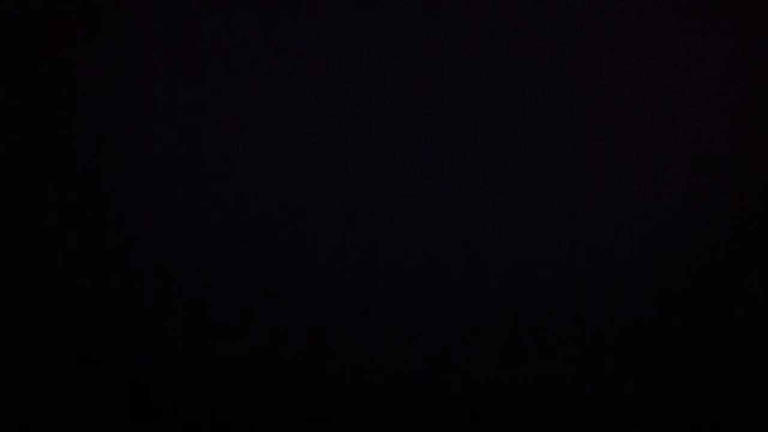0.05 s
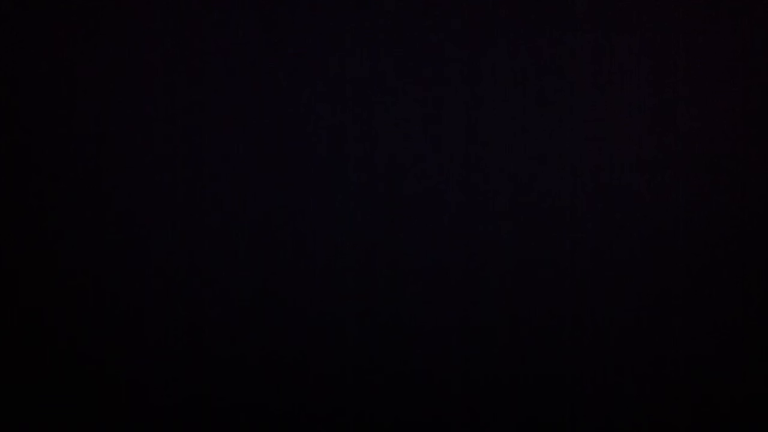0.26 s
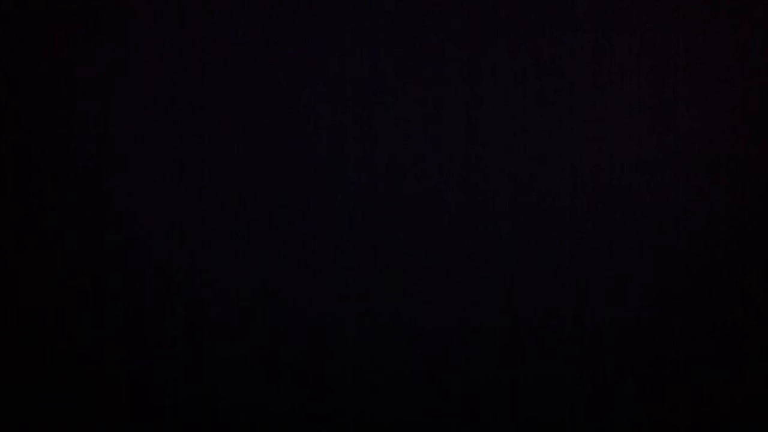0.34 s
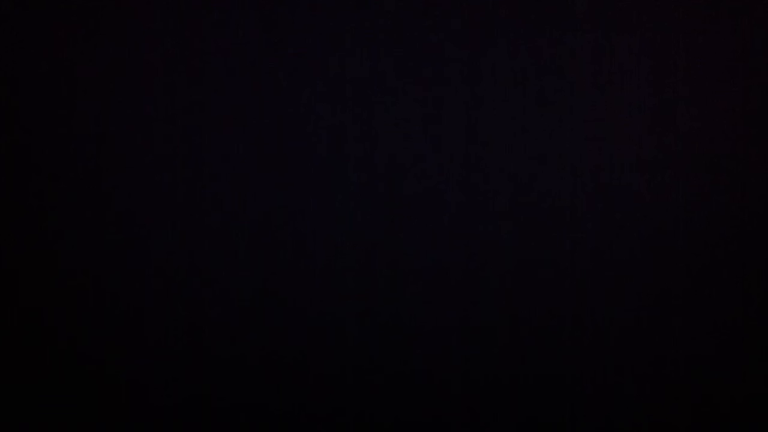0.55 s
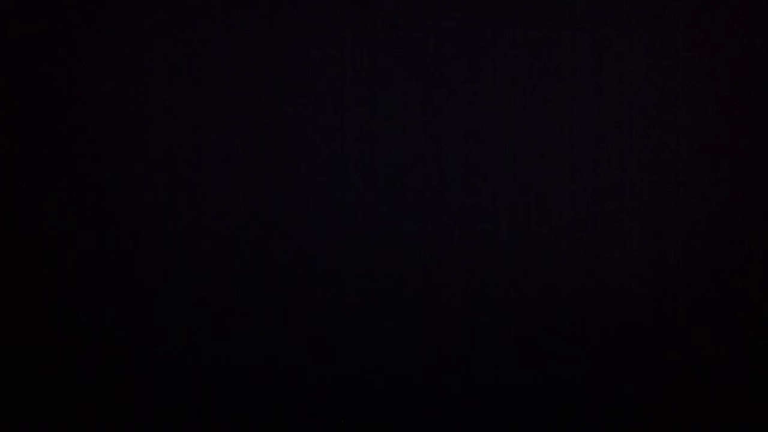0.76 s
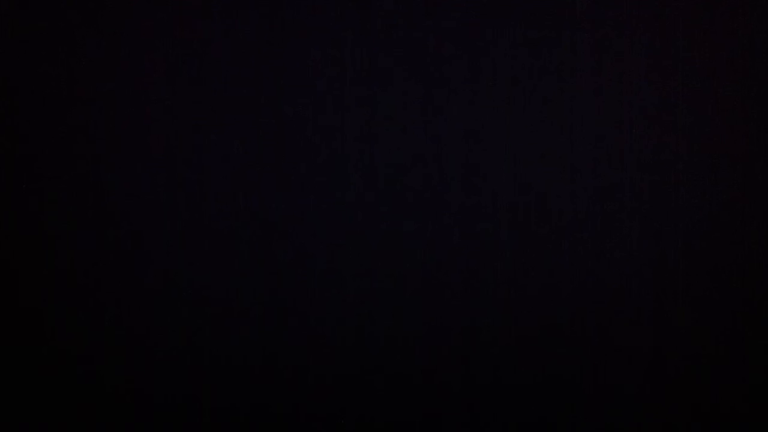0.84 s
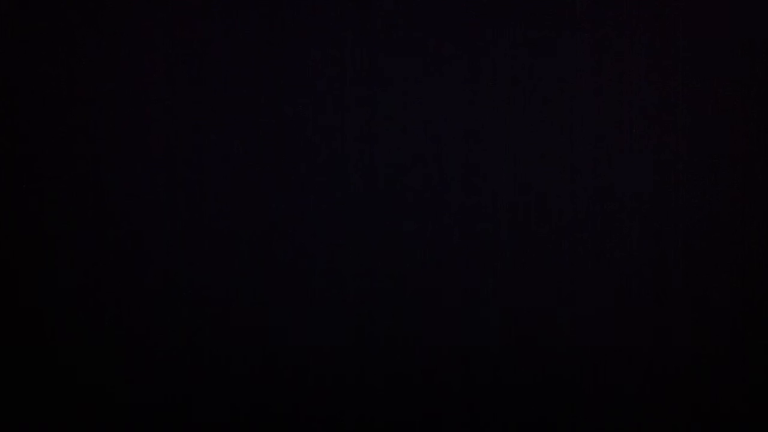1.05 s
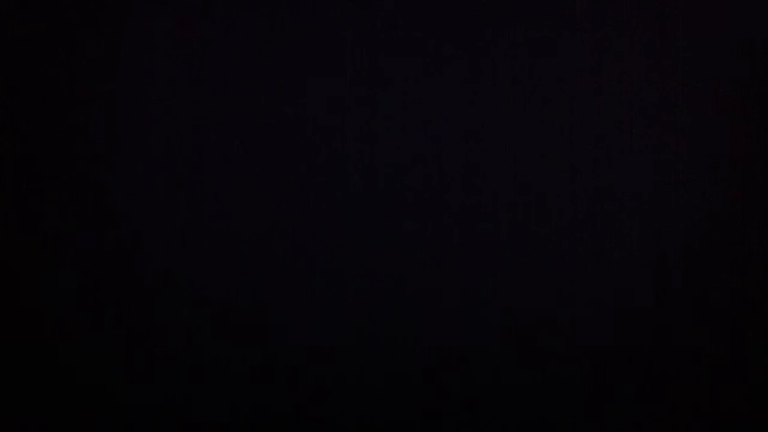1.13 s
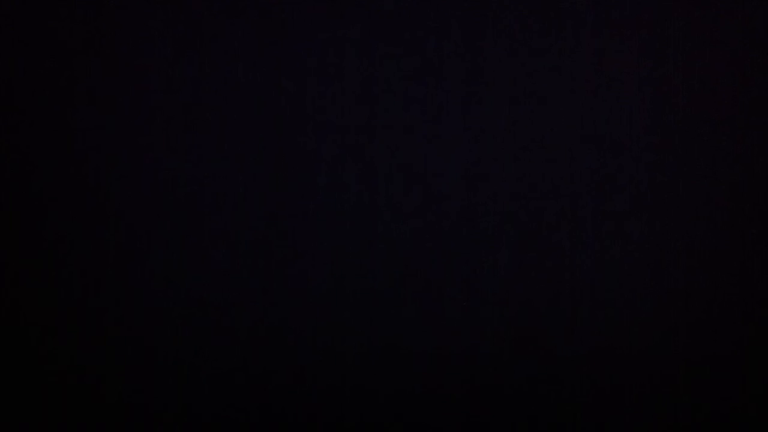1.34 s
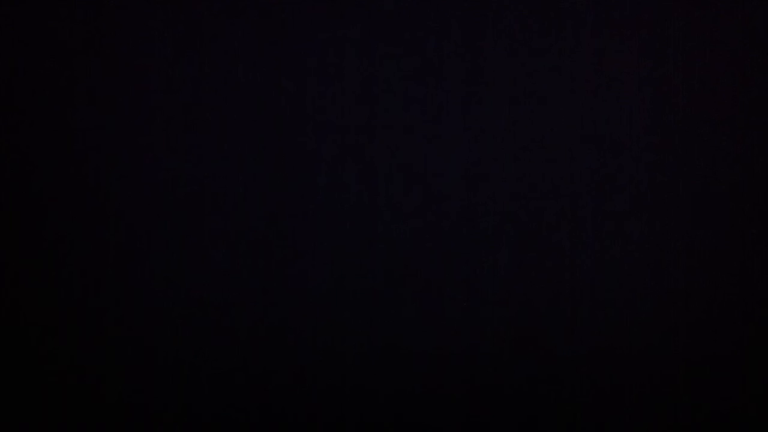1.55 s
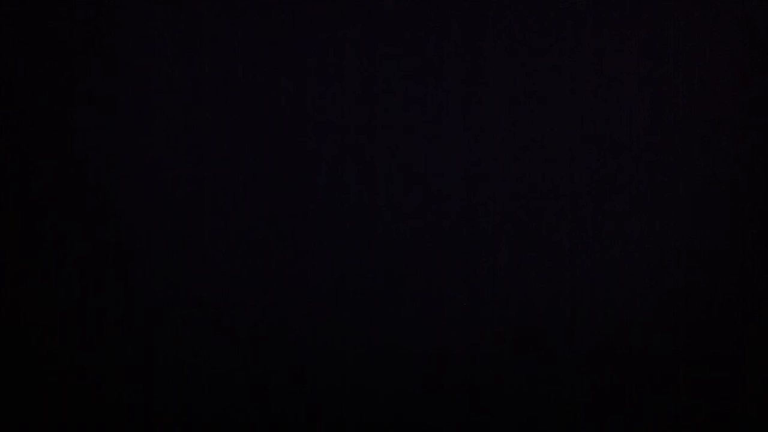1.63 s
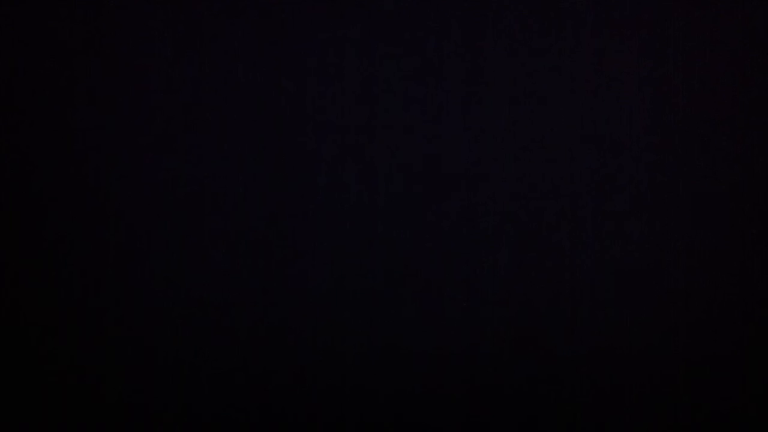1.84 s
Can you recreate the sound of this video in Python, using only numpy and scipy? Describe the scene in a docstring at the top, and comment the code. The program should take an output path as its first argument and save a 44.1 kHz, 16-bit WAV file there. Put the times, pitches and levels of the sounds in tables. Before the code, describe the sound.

A coyote yips roughly, then howls with a fading warble onto one high steady note outdoors

```python
"""Outdoors at night, a coyote gives a rough rising yip, then a near-pure howl, built from swept sines and rasping noise.
The howl's warble fades as it settles on one high note; faint gliding tones, mostly lower, answer from far off.
Delayed copies and a thin noise tail give the dull echoes of the ground and trees.
Close to the microphone are one sharp click of ringing modes, around which the background drops out,
a few soft handling bumps of low noise, and steady coloured hiss."""
import sys
import numpy as np
from scipy import signal
from scipy.fft import rfft, irfft
from scipy.io import wavfile
from scipy.ndimage import uniform_filter1d

SR = 44100
rng = np.random.default_rng(int(sys.argv[2]) if len(sys.argv) > 2 else 0)


def wav_record(signal):
    """Record a signal, one row per channel, as 16-bit PCM in the file named by sys.argv[1]."""
    frames = np.transpose(np.atleast_2d(signal))
    bounded = np.clip(frames, -1, 1)
    # unit amplitude maps onto the largest positive 16-bit level
    quanta = np.round(bounded * 32767).astype(np.int16)
    wavfile.write(sys.argv[1], SR, quanta)


N = 83790
T = np.arange(N) / SR   # time of every sample, s


def from_db(db):
    """Turn decibels into an amplitude gain."""
    return 10 ** (np.asarray(db) / 20)


def rms_one(x):
    """Scale a signal to unit rms."""
    return x / np.sqrt(np.mean(x ** 2) + 1e-20)


def in_time(rows):
    """Interpolate each column of a table, whose first column is time, at every sample."""
    time_s, *columns = np.transpose(rows)
    return [np.interp(T, time_s, column) for column in columns]


def drift(rate_hz):
    """Random wander of unit rms: white noise smoothed by two equal poles at the given rate."""
    pole = np.exp(-2 * np.pi * rate_hz / SR)
    white = rng.standard_normal(2 * N)
    wander = signal.lfilter([1], [1, -2 * pole, pole * pole], white)
    return rms_one(wander[N:])   # the first half lets the filter settle


def band_noise(low_hz, high_hz):
    """Noise between two band edges, at unit rms."""
    edges = np.sort(np.clip([low_hz, high_hz], 10, SR / 2 - 10))
    band = signal.butter(2, edges, "band", fs=SR, output="sos")
    return rms_one(signal.sosfilt(band, rng.standard_normal(2 * N))[N:])


def tone(pitch_hz):
    """A sine of unit rms whose phase accumulates a moving pitch."""
    return np.sqrt(2) * np.sin(2 * np.pi * np.cumsum(pitch_hz) / SR)


def swell(centre_s, half_s):
    """A bell-shaped envelope, down to 1/e at half_s either side of its centre."""
    return np.exp(-((T - centre_s) / half_s) ** 2)


# Spectrum of microphone hiss and night air: frequency_hz, relative_level_db
HISS_SPECTRUM = [(30, -6), (60, -4), (120, 2.5), (180, 9), (300, 5), (450, 3.5), (700, 2.5), (1000, 3.5),
                 (1500, -1.5), (2200, -2.5), (4000, -3.5), (8000, -5), (14000, -6), (16000, -5.5)]
HISS_DB = -68.5   # rms level


def hiss():
    """Even microphone hiss over the faint rush of night air: white noise shaped in frequency."""
    frequency_hz, level_db = np.transpose(HISS_SPECTRUM)
    bins_hz = np.arange(N // 2 + 1) * SR / N
    colour = from_db(np.interp(np.log(bins_hz + 1), np.log(frequency_hz), level_db))
    return from_db(HISS_DB) * rms_one(irfft(rfft(rng.standard_normal(N)) * colour, N))


# Calls of the far-off coyotes:
# start_s, length_s, first_pitch_hz, last_pitch_hz, level_db, octave_db (second harmonic over the first)
FAR_CALLS = [(0.086, 0.13, 465, 472, -75, -14), (.11, .07, 1073, 908, -75, -10),
             (0.259, 0.058, 550, 612, -73.5, 3.5), (0.361, 0.028, 595, 651, -78, 17),
             (.405, .06, 1400, 1180, -72, -25), (0.436, 0.093, 1010, 908, -71.5, -12.5),
             (0.451, .12, 410, 358.5, -76.5, 1.5), (.555, .028, 590, 660, -71.5, 6),
             (0.577, 0.19, 691, 665, -75.5, -25), (0.644, 0.056, 880, 793, -67, -9),
             (0.683, 0.044, 795, 847, -63, -21), (.772, .05, 785, 825, -64, -22),
             (0.91, 0.17, 600, 516.6, -68.5, -24), (1.042, 0.39, 512, 521, -82.5, -36),
             (1.086, .17, 352.5, 367, -78, -20), (1.394, 0.2, 540, 539, -75.5, -9),
             (1.585, .09, 570, 566, -65, -40)]
FAR_JITTER = 0.0057   # rms pitch wander, as a fraction


def far_howls():
    """Faint gliding notes from far off, each a fundamental and its octave that swell and fade."""
    out = np.zeros(N)
    for start_s, length_s, first_hz, last_hz, level_db, octave_db in FAR_CALLS:
        along = np.clip((T - start_s) / length_s, 0, 1)
        pitch_hz = first_hz + (last_hz - first_hz) * along
        pitch_hz = pitch_hz * (1 + FAR_JITTER * drift(23))
        envelope = np.sqrt(np.abs(np.sin(np.pi * along)))
        voice = tone(pitch_hz) + from_db(octave_db) * tone(2 * pitch_hz)
        out += from_db(level_db) * envelope * voice
    return out


# Echoes of every call from ground and trees: delay_s, level_db (relative to the direct call)
CALL_ECHOES = [(.031, -24), (.058, -22), (.097, -28)]
SCATTER_DB, SCATTER_T60_S = -25, .6
SCATTER_LOW_HZ, SCATTER_HIGH_HZ = 230, 2060


def outdoors(calls):
    """Add a few delayed copies and a thin, dull scatter from the trees, made with decaying noise."""
    echoes = sum(from_db(level_db) * np.interp(T - delay_s, T, calls, left=0)
                 for delay_s, level_db in CALL_ECHOES)
    response = band_noise(SCATTER_LOW_HZ, SCATTER_HIGH_HZ) * from_db(-60 * T / SCATTER_T60_S)
    response = response / np.linalg.norm(response)   # unit energy
    scatter = signal.fftconvolve(calls, response)[:N]
    return calls + echoes + from_db(SCATTER_DB) * scatter


# Handling bumps at the microphone: centre_s, half_length_s, level_db
HANDLING_BUMPS = [(0.17, 0.041, -67), (0.399, .025, -77), (.545, 0.016, -69), (0.601, 0.014, -65),
                  (0.763, 0.035, -75.5), (0.904, 0.017, -73), (1, 0.0091, -65.5), (1.093, 0.013, -64.5),
                  (1.363, 0.015, -74.5), (1.815, 0.018, -64.5)]
BUMP_LOW_HZ, BUMP_HIGH_HZ = 74, 155


def bumps():
    """Soft thuds of a hand on the microphone's housing: swells of low noise."""
    envelope = sum(from_db(level_db) * swell(centre_s, half_s)
                   for centre_s, half_s, level_db in HANDLING_BUMPS)
    return envelope * band_noise(BUMP_LOW_HZ, BUMP_HIGH_HZ)


# Ringing modes of the close click, before its filters: frequency_hz, relative_level_db, t60_s
CLICK_RINGS = [(595, -17.8, .006), (1033, -32, .012), (2023, -22, .007), (2465, -12, .0047),
               (3215, -11.2, .0034), (4900, -31, .0024), (9582, -26, .005), (10770, -32, .0026),
               (11623, -20, .0027)]
CLICK_S, CLICK_GAIN_DB = .24078, .3
CLICK_LOW_HZ, CLICK_SOFT_HZ, CLICK_TOP_HZ = 368, 2557, 14500   # gentle band edges, steep top cut
FIZZ_DB, FIZZ_T60_S = -49, .012


def click():
    """One hard, dry tick: modes that ring for milliseconds through a gentle band, with a trace of noisy fizz."""
    rings = sum(from_db(level_db - 60 * T / t60_s) * np.cos(2 * np.pi * frequency_hz * T)
                for frequency_hz, level_db, t60_s in CLICK_RINGS)
    contact = signal.butter(1, [CLICK_LOW_HZ, CLICK_SOFT_HZ], "band", fs=SR, output="sos")
    top = signal.butter(6, CLICK_TOP_HZ, fs=SR, output="sos")
    # the tiny offset keeps the filters clear of vanishingly small numbers
    filtered_rings = signal.sosfilt(np.vstack([contact, top]), rings + 1e-18)
    fizz = from_db(FIZZ_DB - 60 * T / FIZZ_T60_S) * band_noise(1700, 10000)
    tick = from_db(CLICK_GAIN_DB) * filtered_rings + fizz
    return np.concatenate([np.zeros(round(CLICK_S * SR)), tick])[:N]


# The opening yip: time_s, pitch_hz, level_db, roughness (0-1)
YIP_CURVE = [(.30, 449.4, -115, 0.06), (.328, 481, -69, 0.1), (.34, 544, -60, 0.14),
             (.368, 744, -52.5, 0.2), (.376, 800, -71, 0.85), (.383, 951, -54.5, 0.7),
             (.398, 1009, -59.5, 0.71), (.418, 964, -56, .3), (.434, 825, -64.5, .3), (.455, 680, -76, .3),
             (.49, 690, -125, 0)]
YIP_JITTER, YIP_OCTAVE_DB = 0.048, -18   # rms pitch fraction at full roughness; second harmonic
RASP_DB, RASP_HZ, RASP_WIDTH_HZ = -1.5, 1237, 250   # at full roughness, relative to the voice
GRIT_DB = -7.5


def yip():
    """An upward slide that breaks at the top: roughness shakes the pitch and adds two bands of noise."""
    pitch_hz, level_db, rough = in_time(YIP_CURVE)
    pitch_hz = pitch_hz * (1 + YIP_JITTER * rough * drift(150))
    voice = tone(pitch_hz) + from_db(YIP_OCTAVE_DB) * tone(2 * pitch_hz)
    rasp_noise = band_noise(RASP_HZ - RASP_WIDTH_HZ / 2, RASP_HZ + RASP_WIDTH_HZ / 2)
    rasp = from_db(RASP_DB) * rough * rasp_noise
    grit = from_db(GRIT_DB) * rough * band_noise(1300, 1560)
    return from_db(level_db) * (voice + rasp + grit)


# Middle pitch of the howl, about which it warbles: time_s, pitch_hz
HOWL_MIDDLE_PITCH = [(.56, 760), (.62, 890), (.70, 853), (.76, 943.4), (.87, 987.6), (.92, 969), (1.0, 992),
                     (1.14, 1013), (1.27, 1032), (1.4, 1069), (1.53, 1099), (1.63, 1109), (1.7, 1096),
                     (1.9, 1108)]
# Loudness of the howl before warble and shimmer: time_s, level_db
HOWL_LOUDNESS = [(.555, -98), (.58, -61), (.615, -56), (.68, -63), (.725, -56.5), (.85, -53.5), (.895, -55),
                 (.92, -60.5), (.965, -50.5), (1.02, -53.5), (1.04, -55.5), (1.1, -49.5), (1.15, -52.5),
                 (1.175, -57), (1.22, -48.5), (1.3, -53), (1.36, -49.5), (1.42, -50.5), (1.58, -52),
                 (1.66, -55), (1.75, -52.5), (1.9, -56)]
# Moments when the voice cracks: centre_s, level_db
VOICE_CRACKS = [(.622, -69), (.877, -70.5), (.995, -68.5)]
WARBLE_RATE_HZ, WARBLE_CREST_S = 7.72, .619   # the warble is fullest at this crest
WARBLE_SWING_HZ, WARBLE_FADE_S = 76, .66   # swing either side when fullest; bell half-length
CREST_DB = 2   # lift on each crest of a full warble
HOWL_JITTER, HOWL_SHIMMER_DB = .008, 1.2   # rms pitch fraction and level wander at full warble
# second harmonic: level, lift on crests, change once the note is steady
OCTAVE_DB, OCTAVE_CREST_DB, OCTAVE_SETTLED_DB = -18, 7, -27.5
OCTAVE_LEAD_S = 0.015   # the mouth opens just ahead of each crest
MOUTH_HZ, MOUTH_WIDTH_HZ = 2050, 280   # resonance that shapes the second harmonic
CRACK_HALF_S, CRACK_PITCH_RATIO, CRACK_JITTER = 0.016, 1.5, 0.054


def howl():
    """A warble swings pitch, loudness and brightness together and fades; the voice cracks on some crests."""
    (middle_hz,), (level_db,) = in_time(HOWL_MIDDLE_PITCH), in_time(HOWL_LOUDNESS)
    unrest = swell(WARBLE_CREST_S, WARBLE_FADE_S)
    warble = unrest * np.cos(2 * np.pi * WARBLE_RATE_HZ * (T - WARBLE_CREST_S))
    pitch_hz = middle_hz + WARBLE_SWING_HZ * warble
    pitch_hz = pitch_hz * (1 + HOWL_JITTER * np.sqrt(unrest) * drift(54))
    shimmer_db = HOWL_SHIMMER_DB * np.sqrt(unrest) * drift(31)
    level = from_db(level_db + CREST_DB * warble + shimmer_db)

    mouth = 1 / np.hypot(1, 2 * (2 * pitch_hz - MOUTH_HZ) / MOUTH_WIDTH_HZ)
    opening = unrest * np.cos(2 * np.pi * WARBLE_RATE_HZ * (T + OCTAVE_LEAD_S - WARBLE_CREST_S))
    settled_db = OCTAVE_SETTLED_DB * (1 - unrest) ** 2
    octave = mouth * from_db(OCTAVE_DB + OCTAVE_CREST_DB * opening + settled_db)
    voice = level * (tone(pitch_hz) + octave * tone(2 * pitch_hz))

    crack_level = sum(from_db(crack_db) * swell(centre_s, CRACK_HALF_S)
                      for centre_s, crack_db in VOICE_CRACKS)
    crack_hz = CRACK_PITCH_RATIO * pitch_hz * (1 + CRACK_JITTER * drift(145))
    return voice + crack_level * tone(crack_hz)


DROPOUT_S, DROPOUT_HALF_S, DROPOUT_DB = .2455, .0105, -25   # centre, half-length, depth


def scene():
    """Calls, bumps and hiss drop out briefly around the click, which keeps its full level."""
    inside = 1.0 * (np.abs(T - DROPOUT_S) < DROPOUT_HALF_S)
    dropout = from_db(DROPOUT_DB * uniform_filter1d(inside, size=130))   # edges softened over 130 samples
    calls = outdoors(far_howls() + yip() + howl())
    background = hiss() + calls + bumps()
    return (dropout * background + click())[None]


def record(dry):
    """Cut the top steeply above 16 kHz with an elliptic low-pass."""
    top_cut = signal.ellip(10, .1, 70, 16000, fs=SR, output="sos")
    return signal.sosfilt(top_cut, dry)


dry = scene()
out = record(dry)
wav_record(out)
```